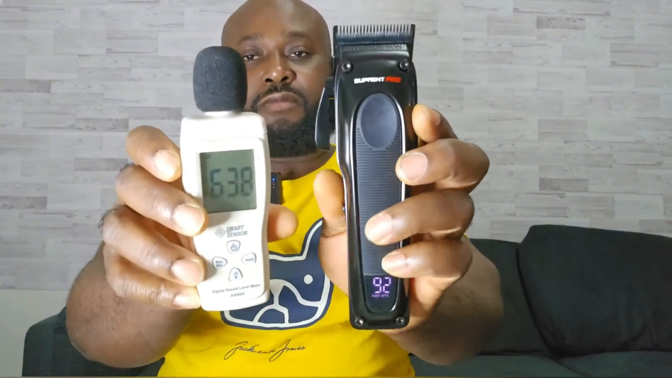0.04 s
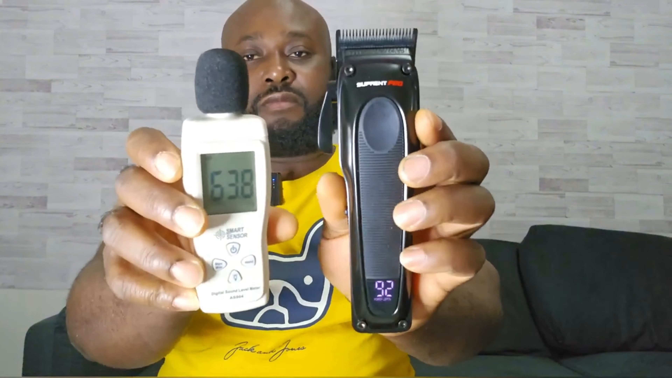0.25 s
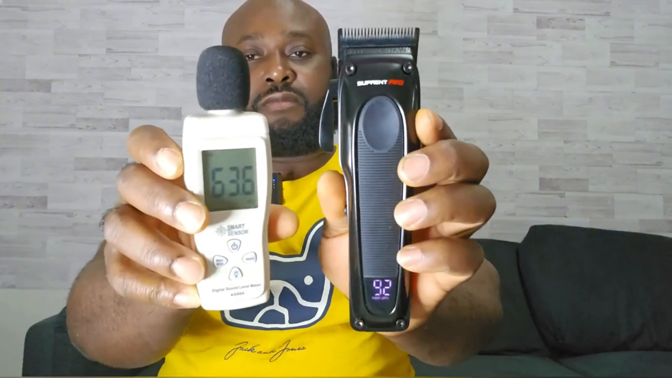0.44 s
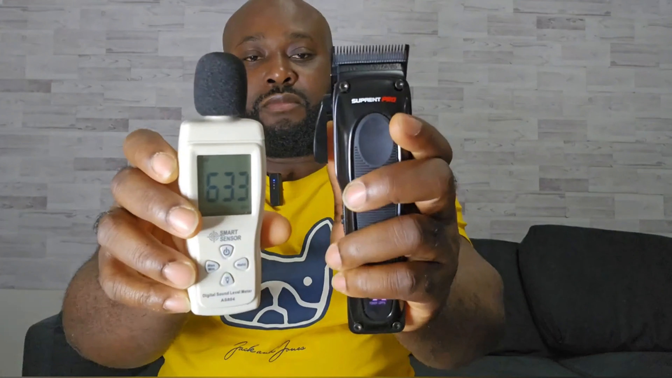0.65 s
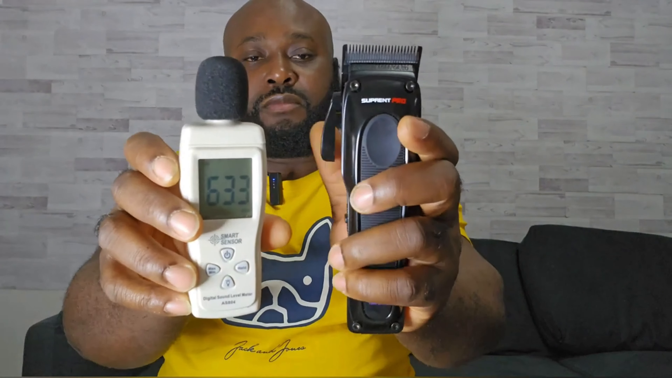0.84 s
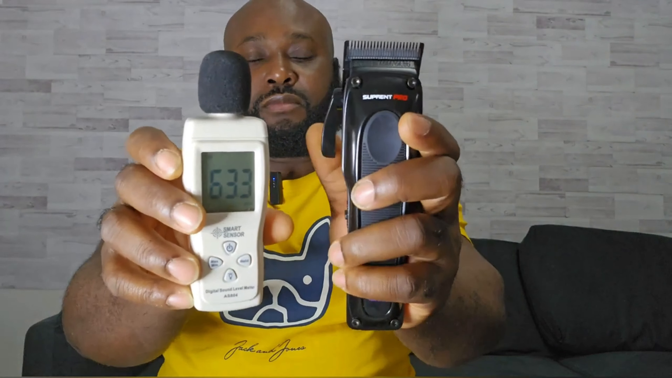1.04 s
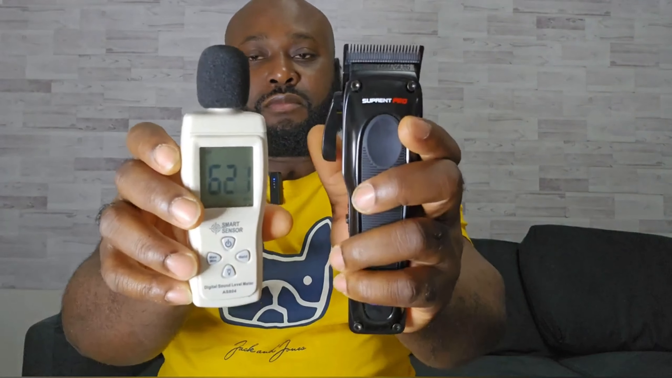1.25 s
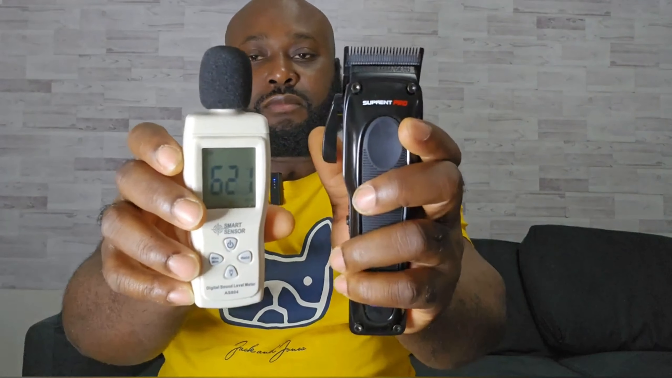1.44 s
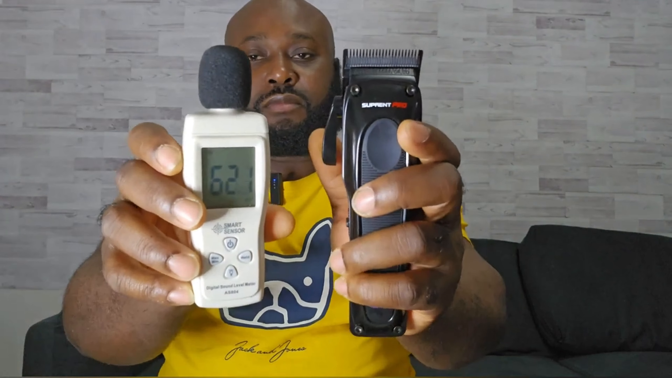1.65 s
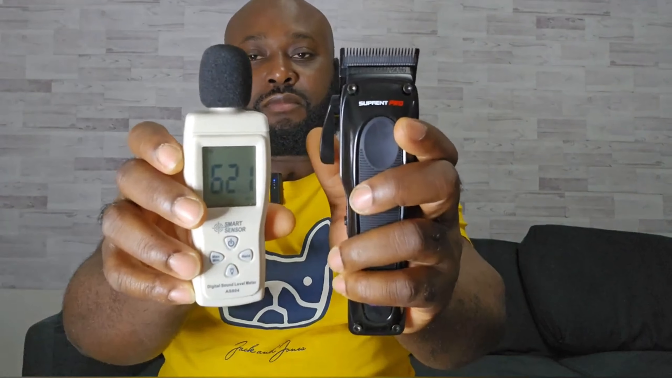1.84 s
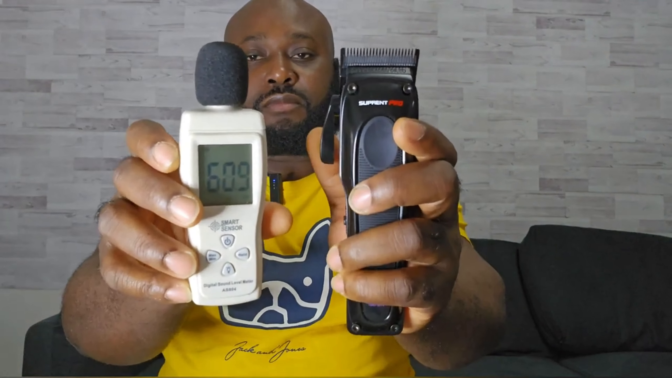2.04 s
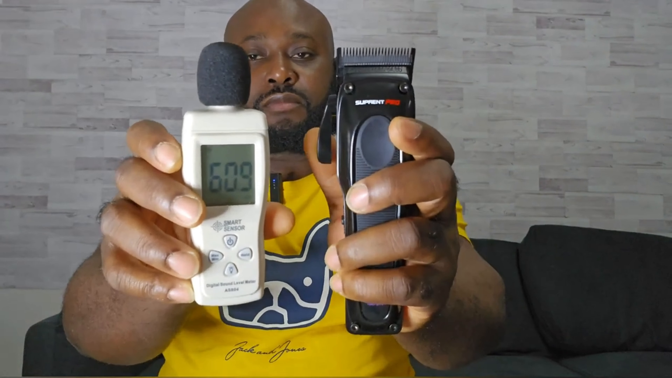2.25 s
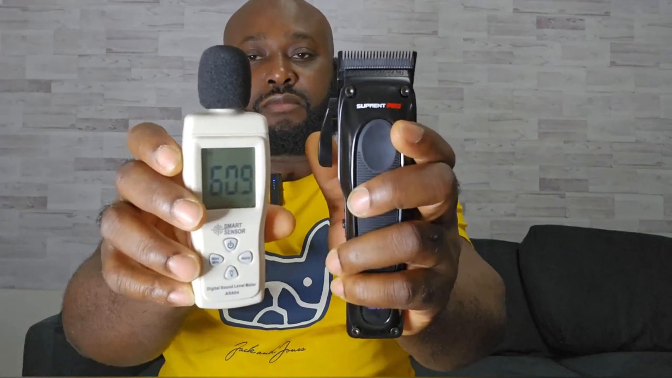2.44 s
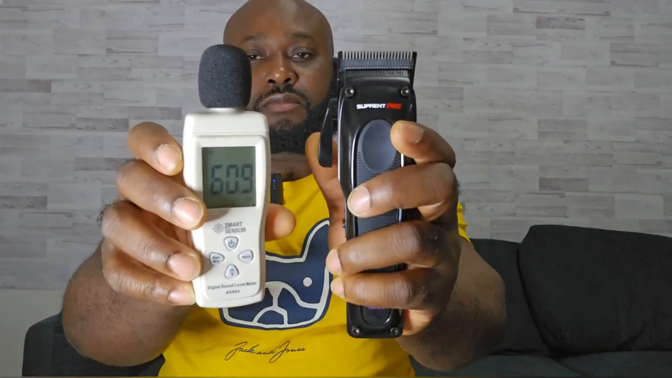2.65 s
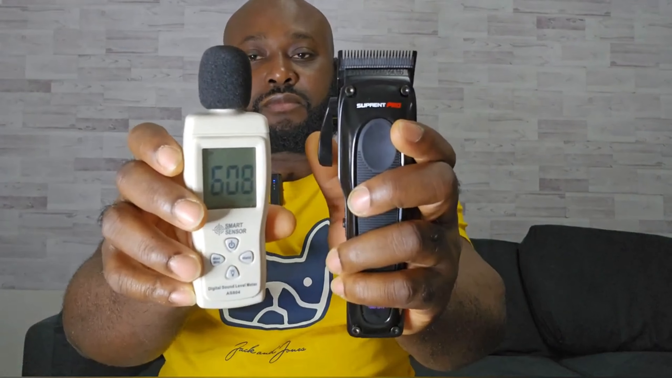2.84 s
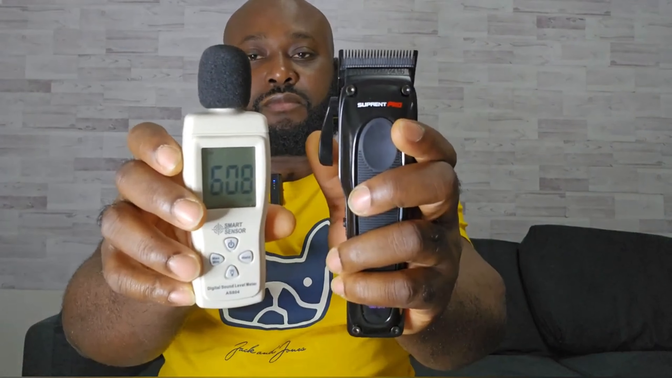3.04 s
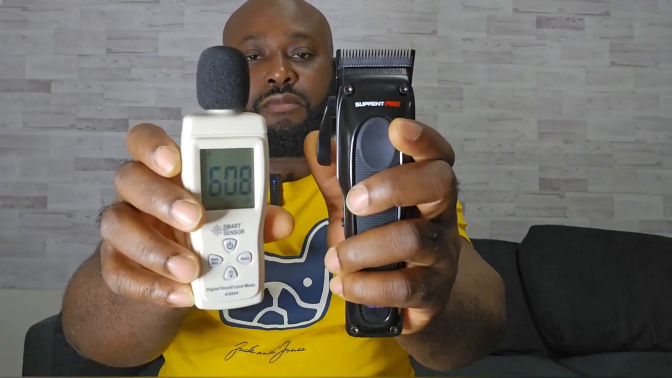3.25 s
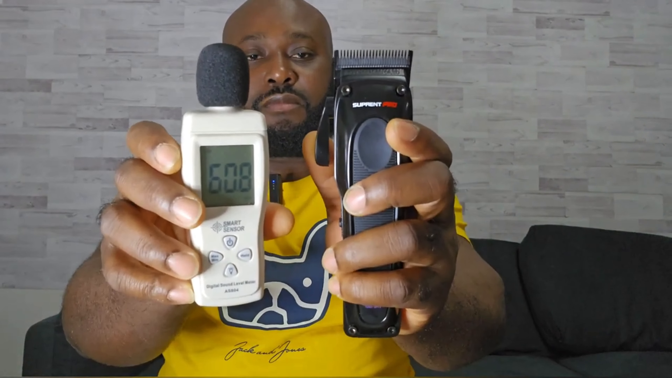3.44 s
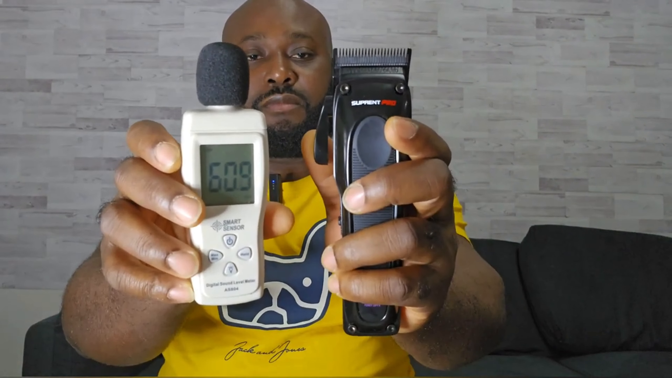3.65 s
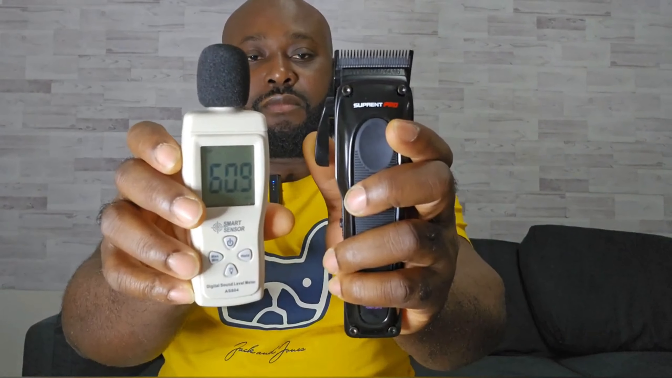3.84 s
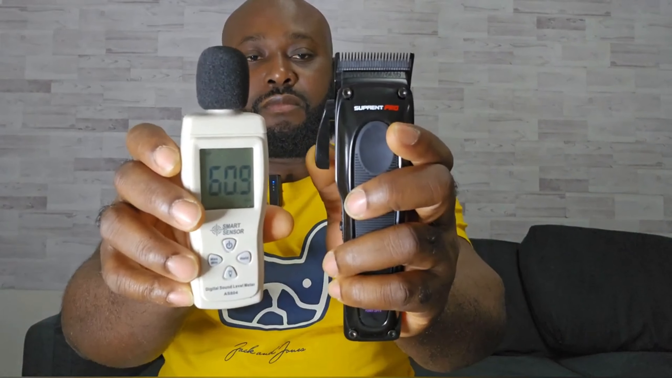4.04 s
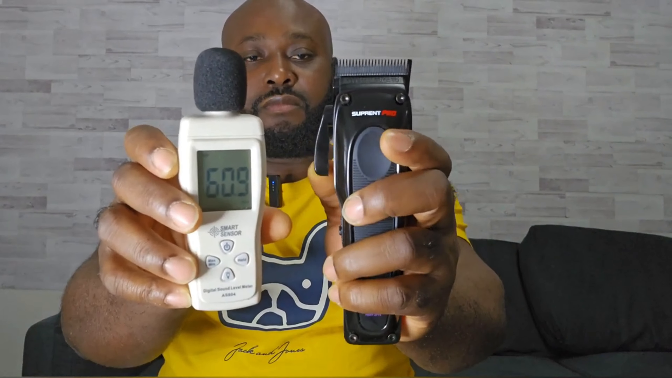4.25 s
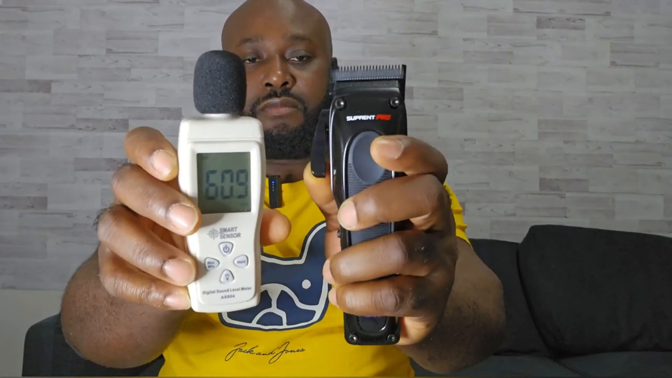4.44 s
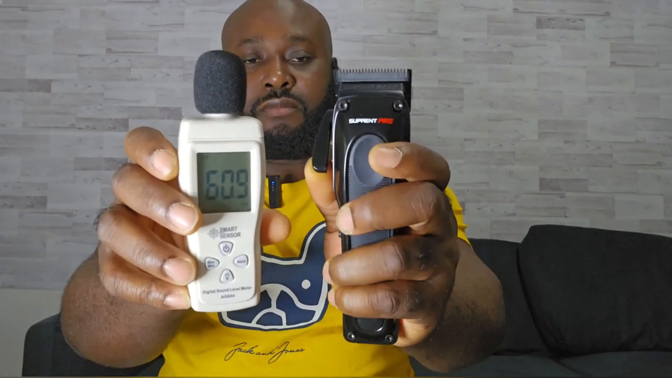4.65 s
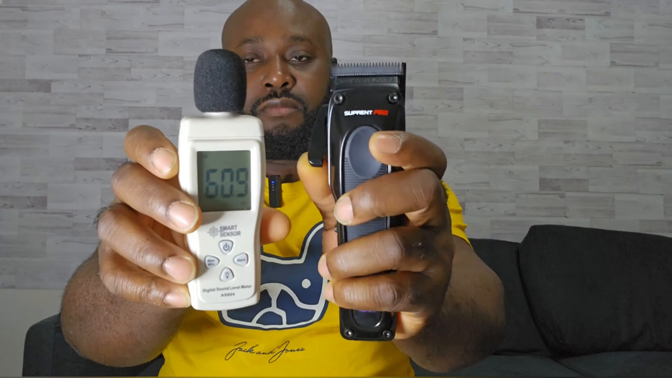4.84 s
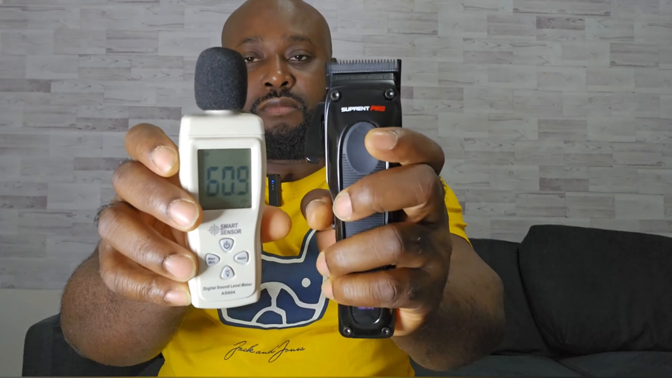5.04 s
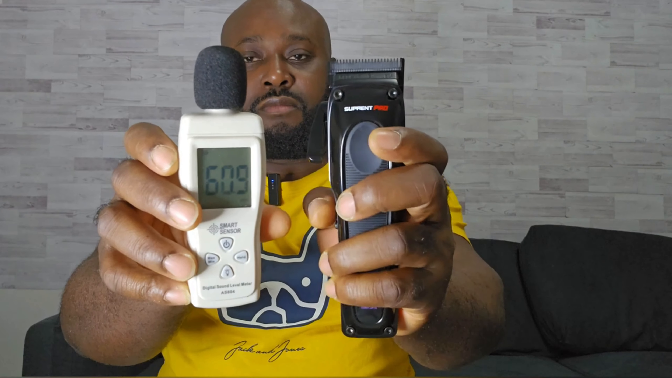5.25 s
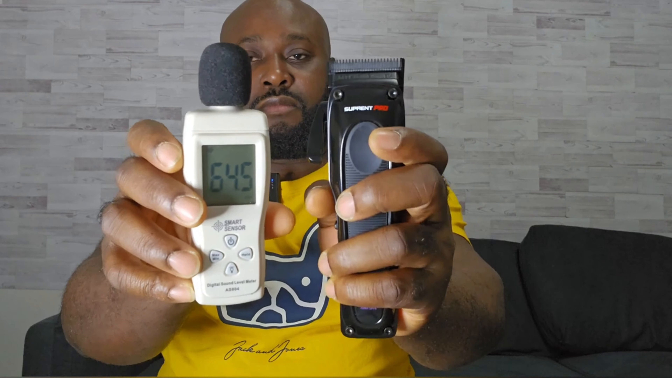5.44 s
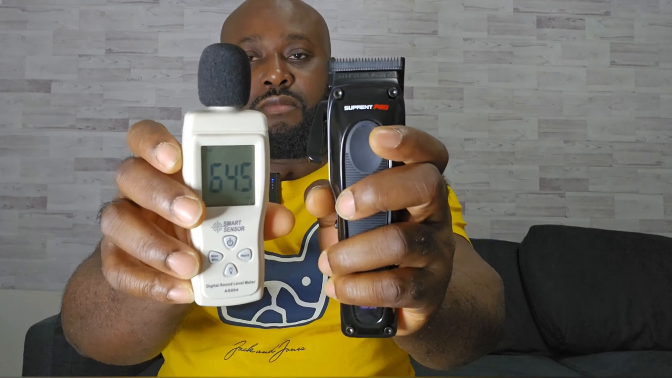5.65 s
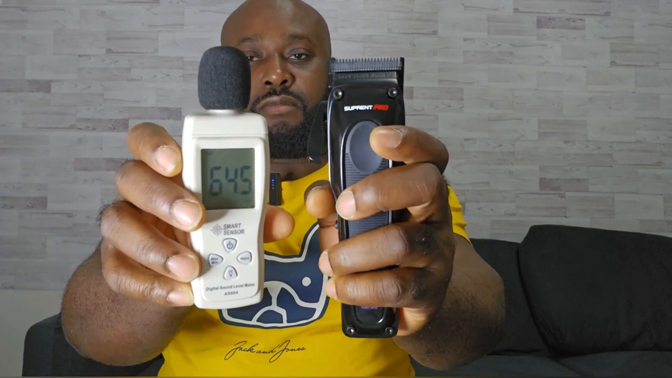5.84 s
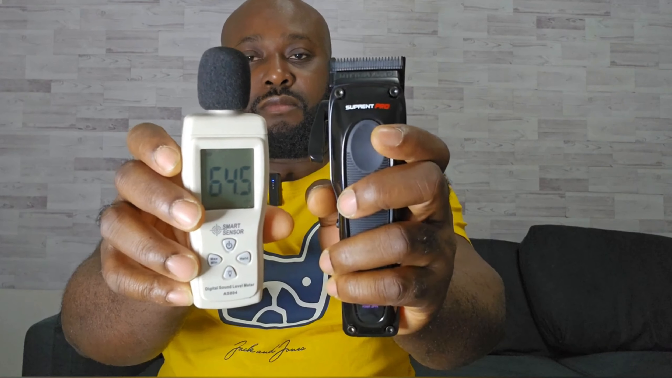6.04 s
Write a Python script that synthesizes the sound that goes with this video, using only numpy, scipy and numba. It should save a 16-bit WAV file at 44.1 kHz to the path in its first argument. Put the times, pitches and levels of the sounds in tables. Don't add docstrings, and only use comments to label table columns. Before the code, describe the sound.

Close, dry, nasal motor buzz with a raspy blade scrape, steady in pitch, picked up by a phone in a small room. Dull finger bumps and sleeve movement come midway. The clipper turns, its buzz wavering and getting thinner, while four hard metallic clicks snap in quick succession. Automatic gain then pulls everything down for about a second before a quieter buzz returns.

```python
import sys
import numpy as np
from scipy import signal
from scipy.fft import rfft, irfft, next_fast_len
from scipy.io import wavfile
from scipy.ndimage import uniform_filter1d
from numba import njit

SR = 44100
rng = np.random.default_rng(int(sys.argv[2]) if len(sys.argv) > 2 else 0)


def dump_mix(stems):
    frames = np.atleast_2d(stems).T
    limited = np.clip(frames, -1, 1)
    pcm = np.round(limited * 32767).astype(np.int16)
    wavfile.write(sys.argv[1], SR, pcm)


def amplitude_ratio(level_db):
    exponent = np.asarray(level_db, float) / 20
    return 10 ** exponent


N = 269451
HOP = SR // 100
SPLICE_S = .682


def shape(points, hz):
    f, value = np.transpose(points)
    return np.interp(np.log(np.maximum(hz, 1)), np.log(f), value)


def noise(db_of):
    size = next_fast_len(N)
    hz = np.arange(size // 2 + 1) * SR / size
    gain = amplitude_ratio(db_of(hz)) * np.sqrt(SR / 2)
    return irfft(rfft(rng.standard_normal(size)) * gain, size)[:N]


def walk(rate, count, size):
    k = max(int(100 / rate), 1)
    held = np.repeat(rng.standard_normal((count, size)), k, axis=1)[:, :size]
    return 1.44 * uniform_filter1d(uniform_filter1d(held, k), k)


@njit
def lines(turns, multiple, gain, phase, hop):
    out = np.zeros(len(turns))
    for start in range(0, len(turns) - 1, 49):
        for k in range(len(multiple)):
            z = np.exp(1j * (2 * np.pi * multiple[k] * turns[start] + phase[k]))
            spin = np.exp(2j * np.pi * multiple[k] * (turns[start + 1] - turns[start]))
            for i in range(start, min(start + 49, len(turns))):
                j, a = i // hop, (i % hop) / hop
                out[i] += ((1 - a) * gain[k, j] + a * gain[k, j + 1]) * z.imag
                z *= spin
    return out


# time in seconds, rate in Hz.
SWING_RATE = [(0, 116.88), (.7, 116.9), (.9, 117.0), (1.45, 116.97), (1.95, 116.87), (2.1, 116.72),
              (2.5, 116.84), (4.32, 116.86), (4.358, 118.8), (4.466, 117.4), (4.54, 118.0), (4.75, 117.2),
              (5.3, 117.03), (5.6, 116.92), (6.11, 116.9)]
SWING_HZ = SWING_RATE[0][1]


def crank(t):
    hz = np.interp(t, *np.transpose(SWING_RATE))
    return np.cumsum(hz) / SR + .25 - .45 * (t > SPLICE_S)


# middle in seconds, duration in seconds.
GRIP_CHANGES = [
    (0.678, .002),
    (1.9, 1.2),
    (4.345, 0.0098),
    (4.883, .12),
]


def grip(t):
    at = [s + side * d / 2 for s, d in GRIP_CHANGES for side in (-1, 1)]
    return np.interp(t, at, np.repeat(np.arange(len(GRIP_CHANGES) + 1), 2)[1:-1])


# frequency in Hz, level in dB.
TURNED_AWAY = [(6000, -0.5), (7000, 0.5), (7600, 8), (8500, 0.5), (10500, 2.5), (13000, -12), (14200, -9),
               (14900, -35)]


def shadow(hz):
    return shape(TURNED_AWAY, hz)


# multiple of swing rate, then level in dB facing, held, turning, turned.
CASE_PANELS = [(1, -23, -25, -12.5, -14.5), (2, -37, -44.5, -30.5, -34.5), (3, -10, -10, -11, -12.5),
               (4, -10, -9.5, -7, -17.5), (5, -8.5, -11.5, -11, -7), (6, -8.5, -9.5, -20, -17.5),
               (7, 0, -1.0, -2, 1.5), (8, -8.5, -6, -2.5, -4.5), (9, -9.5, -8.5, -7, -15),
               (10, -16, -11.5, -14, -21.5), (11, -17, -37.5, -9.5, -17), (12, -8, -24.5, -12.5, -0.5),
               (13, -17, -16.5, -19.5, -9.5), (14, -19, -89, -14.5, -4), (15, -11, -10.5, -19.5, -6),
               (16, -7, -5.5, -13, -8.5), (17, -12, -12.5, -10.5, -8), (18, -14.5, -17, -18, -19),
               (19, -13.5, -12, -10, -9.5), (20, -22, -17.0, -21, -22), (21, -10, -18.5, -7.5, -5.5),
               (22, -19.5, -17.5, -23, -17), (23, -28.5, -33, -23, -38), (24, -40, -53, -23.5, -15)]
# multiple of swing rate, level in dB facing, just gripped, settled.
BLADE_FRONT = [(25, -23, -29, -18), (26, -33, -18, -18), (27, -33, -26, -18), (28, -23.5, -32, -40),
               (29, -15, -14.5, -19.5), (30, -19, -24, -24), (31, -25, -27, -19), (32, -22, -30, -21),
               (33, -23, -27, -20), (34, -32, -26, -21.5), (35, -24, -22.0, -17.5),
               (36, -26.5, -16.5, -15.0), (37, -21, -28, -22), (38, -24, -19.5, -14.5),
               (39, -27.0, -38.5, -34.5), (40, -27, -20, -19), (41, -29.0, -30, -24),
               (42, -33.0, -17.0, -14), (43, -40.5, -30, -23.5), (44, -37.0, -19, -21.5),
               (45, -21.5, -32, -33), (46, -34, -21, -21.5), (47, -39.0, -28, -29), (48, -28.5, -28.5, -24),
               (49, -37, -25, -23), (50, -41, -27.5, -36.0), (51, -24, -28, -43), (52, -37, -27, -30),
               (53, -37, -18, -21.5), (54, -30.5, -28, -25)]
# multiple of swing rate, level in dB turning, turned.
BLADE_BEHIND = [(25, -9.5, -13.5), (26, -18.5, -36), (27, -14.5, -7.5), (28, -15, -16), (29, -23.5, -11),
                (30, -14.5, -43), (31, -14, -31), (32, -22, -9.5), (33, -28, -32), (34, -32, -31),
                (35, -26, -18), (36, -23.75, -34), (37, -15, -17), (38, -19.5, -34), (39, -26.5, -21),
                (40, -29.0, -34), (41, -19, -14.5), (42, -21.5, -31), (43, -28, -30), (44, -17, -19),
                (45, -36, -33), (46, -19.5, -25), (47, -24, -19), (48, -21.5, -24), (49, -24, -22),
                (50, -29, -26.5), (51, -32, -23), (52, -29.5, -21), (53, -25.25, -16.5), (54, -20, -15)]
# frequency in Hz, level in dB.
TOOTH_LINES = [(6600, -38), (7200, -27.5), (8500, -53.5), (9500, -30), (11000, -49.5), (12000, -60)]


def grip_levels(hz, uneven_db=3.0):
    facing, held, turning, turned = np.transpose(CASE_PANELS)[1:]
    case = [facing, held, held, turning, turned]
    blades = np.vstack([np.transpose(BLADE_FRONT)[1:], np.transpose(BLADE_BEHIND)[1:]])
    grips = np.hstack([case, blades])
    high_hz = hz[grips.shape[1]:]
    teeth = shape(TOOTH_LINES, high_hz) - 2
    teeth = teeth + uneven_db * rng.standard_normal((len(grips), len(teeth)))
    teeth[-1] += shadow(high_hz)
    grips = np.hstack([grips, teeth])
    power = np.sum(amplitude_ratio(grips[:, 2:22]) ** 2 / 2, axis=1, keepdims=True)
    return grips - 10 * np.log10(power)


# time in seconds, centre in Hz, width in Hz, level in dB, length in seconds.
PANEL_FLARES = [
    (4.36, 2480, 150, 7.5, 0.014),
    (4.416, 2050, 200, -3, .05),
    (4.62, 1350, 150, 3, 0.096),
    (4.8, 2220, 100, 5.5, 0.057),
    (4.8, 3250, 350, 6.5, .07),
]
# frequency in Hz, delay in ms.
RING_LAG = [(700, 4.2), (820, -.5), (950, 0), (1060, -.6), (1170, -2.4), (1520, -3), (1860, .8),
            (1990, -2.1), (2110, -.7), (2300, -2.3), (2520, .4), (4100, .3), (4300, -1.7), (12000, -2)]
# frequency in Hz, phase in radians.
RETURN_STROKE = [(700, -.7), (800, 0), (2800, 0), (3300, -.9), (4100, -.9), (4300, .5)]


def housing(turns, wander_db=.5, wander_top_db=0.8, turning_db=0.5, scatter=0.48):
    t = np.arange(N // HOP + 2) / 100
    order = np.arange(1., 101.)
    hz = order * SWING_HZ
    grips = grip_levels(hz)
    place = grip(t)
    db = np.array([np.interp(place, np.arange(len(grips)), g) for g in grips.T])
    spread = wander_db + wander_top_db * order[:, None] / len(order)
    db = db + spread * walk(1.91, count=len(order), size=len(t))
    turning = np.clip(1 - np.abs(place - 3), 0, 1)
    db = db + turning_db * turning * walk(14, count=len(order), size=len(t))
    for s, centre, width, flare_db, length in PANEL_FLARES:
        db = db + flare_db * np.exp(-((hz[:, None] - centre) / width) ** 2 - ((t - s) / length) ** 2)
    phase = -2 * np.pi * SWING_HZ * np.cumsum(shape(RING_LAG, hz)) / 1000
    phase = phase + shape(RETURN_STROKE, hz) * (order % 2)
    phase = phase + scatter * np.clip(hz / 2500 - 1, 0, 1) * rng.standard_normal(len(order))
    return lines(turns, order, amplitude_ratio(db), phase, HOP)


# frequency in Hz, density in dB per Hz.
BLADE_SCRAPE = [(300, -86.5), (800, -75), (1200, -75), (1400, -72.5), (1650, -75), (2500, -75.5),
                (4500, -77.5), (6500, -79), (8500, -86), (9500, -87), (11300, -84), (12200, -97.5),
                (14600, -100), (15500, -104)]


def rasp(t, turns, depth=0.11, lopsided=0.06, at_ms=-1.76, shaded_s=4.6):
    angle = 2 * np.pi * (turns - SWING_HZ * at_ms / 1000)
    gate = 1 + depth * np.cos(2 * angle) + lopsided * np.cos(angle)
    away = np.clip((t - shaded_s) / .2, 0, 1)
    facing = noise(lambda hz: shape(BLADE_SCRAPE, hz))
    turned = noise(lambda hz: shape(BLADE_SCRAPE, hz) + shadow(hz))
    return gate * (np.sqrt(1 - away) * facing + np.sqrt(away) * turned)


SCRAPE_BY_GRIP = [-3, -0.5, 1, 3.5, 3.5]
# time in seconds, level in dB.
ARM_LEVEL = [(0, -27), (.3, -26.5), (.68, -27), (1.2, -28.5), (1.6, -28), (3.6, -28), (4.32, -27.5),
             (4.37, -30), (4.45, -32), (6.11, -32)]


def clipper(t):
    turns = crank(t)
    rasp_db = np.interp(grip(t), np.arange(len(SCRAPE_BY_GRIP)), SCRAPE_BY_GRIP) + 24.5
    arm = amplitude_ratio(np.interp(t, *np.transpose(ARM_LEVEL)))
    return arm * (housing(turns) + amplitude_ratio(rasp_db) * rasp(t, turns))


# frequency in Hz, width in Hz, level in dB.
LEVER_MODES = [(950, 500, -15), (2200, 980, -17), (3420, 430, -21), (4360, 3000, -10.5), (5760, 1200, -1.5),
               (6620, 630, -2), (7640, 480, -1.5), (8700, 1200, -7.5), (9870, 710, -1), (10950, 1100, 2),
               (12200, 800, -2), (12900, 1100, -4), (14250, 1600, -4.5)]


def lever(hz, tilt_db):
    power = sum(amplitude_ratio(db) ** 2 / (1 + (2 * (hz - f) / w) ** 2) ** 2 for f, w, db in LEVER_MODES)
    return 10 * np.log10(power + 1e-12) + tilt_db * hz / 10000


# start in seconds, peak in dB, scrape before it in dB,
# scrape length in seconds, room tail in dB.
LEVER_SNAPS = [
    (4.497, 0, -22, .0047, -22),
    (4.53, -1, -21.5, 0.0037, -21),
    (4.6197, -0.5, -19.5, .004, -22),
    (4.6978, 1, -32.5, .002, -23.5),
]


def snaps(t, hold_s=0.0015, ring_s=0.00071, after_db=-13, after_s=0.0078, wall_s=0.0077, t60_s=0.24):
    near = noise(lambda hz: lever(hz, 0))
    far = noise(lambda hz: lever(hz, -5))
    near, far = near / near.std(), far / far.std()
    grains = np.repeat(rng.standard_normal(N // 88 + 1), 88)[:N]
    rattle = amplitude_ratio(1.3 * uniform_filter1d(grains, size=44))
    out = np.zeros(N)
    for s, db, scrape_db, scrape_s, tail_db in LEVER_SNAPS:
        u = t - s
        scrape = amplitude_ratio(scrape_db) * (u > -scrape_s) * (u <= 0)
        crack = (u > 0) * np.exp(-np.maximum(u - hold_s, 0) / ring_s) / 4.3
        chatter = amplitude_ratio(after_db) * (u > 0) * np.clip(2 - 2 * u / after_s, 0, 1) / 2
        walls = np.clip((u - wall_s) / hold_s + 1, .3, 1) * (u > 0)
        tail = amplitude_ratio(tail_db - 60 * np.abs(u) / t60_s) * walls
        out += amplitude_ratio(db) * (near * (scrape + crack + chatter) + far * tail * rattle)
    return out


# start in seconds, peak in dB, pitch in Hz, t60 in seconds, tick in dB.
FINGER_BUMPS = [(2.245, -34, 109, 0.045, -20), (2.84, -34, 105, 0.042, -20), (3.082, -30, 109, 0.051, 0),
                (3.144, -34, 118, 0.038, -20), (3.228, -28, 120, 0.038, -20),
                (3.315, -20.5, 115, 0.034, -14), (3.378, -46, 105, .04, -20), (3.612, -30, 174, 0.011, -14),
                (3.804, -23, 216, 0.016, -1.5), (3.845, -34, 300, .03, -14), (4.168, -35, 102, .04, -20),
                (4.284, -32, 108, .04, -20), (4.549, -34, 105, .05, -20)]


def bumps(t, push_s=0.0034, tick_s=0.0019, hollow=0.9, hollow_hz=1720):
    knock_shape = [(150, 1), (300, -5), (900, -9), (1700, -4), (2500, -26), (5000, -43)]  # Hz, dB
    knock = noise(lambda hz: shape(knock_shape, hz))
    knock = knock / knock.std()
    out = np.zeros(N)
    for s, db, hz, t60, tick_db in FINGER_BUMPS:
        u = np.maximum(t - s, 0)
        push = 1 - np.exp(-(u / push_s) ** 2)
        thud = push * amplitude_ratio(-60 * u / t60) * np.sin(2 * np.pi * hz * u)
        late = np.maximum(u - push_s / 2, 0)
        tick_envelope = late / tick_s * np.exp(1 - late / tick_s)
        tick = tick_envelope * (knock + hollow * np.sin(2 * np.pi * hollow_hz * late))
        out += amplitude_ratio(db) * (thud / np.abs(thud).max() + amplitude_ratio(tick_db) * tick)
    return out


# frequency in Hz, density in dB per Hz.
CLOTH_SHAPE = [(70, -103), (150, -72.5), (250, -70.5), (400, -77), (800, -100)]
# time in seconds, rise over the resting cloth in dB, length in seconds.
SLEEVE_RUSTLES = [(0, 8, .1), (0.603, 4.5, 0.21), (0.856, 12.5, 0.18), (1.46, 7.5, 0.12), (1.7, 5, 0.16),
                  (2.04, 7, 0.1), (3.845, 10, 0.081), (4.222, 9, 0.09), (4.556, 13.5, 0.11),
                  (4.95, 10.5, 0.21)]


def cloth(t):
    db = -10 + sum(up_db * np.exp(-((t - s) / length) ** 2) for s, up_db, length in SLEEVE_RUSTLES)
    return amplitude_ratio(db) * noise(lambda hz: shape(CLOTH_SHAPE, hz))


# frequency in Hz, rms level in dB.
MACHINE_LINES = [(58, -61), (95.4, -49.5), (191, -67.5), (1305, -52.5), (1338, -54), (1375, -60),
                 (1433, -46.5), (1470, -59.5)]


def hum(t, flutter_db=-2.0):
    hz, db = np.transpose(MACHINE_LINES)
    db = db[:, None] + flutter_db * walk(10, count=len(hz), size=N // HOP + 2)
    return lines(t, hz, np.sqrt(2) * amplitude_ratio(db), 2 * np.pi * rng.random(len(hz)), HOP)


# frequency in Hz, density in dB per Hz.
ROOM_RUMBLE = [(20, -75), (40, -71.5), (95, -69), (140, -73.5), (220, -91.5)]


def rumble(t, level_db=-3, swell_db=1.5):
    size = N // HOP + 1
    swell = np.interp(t, np.arange(size) / 100, walk(5, count=1, size=size)[0])
    return amplitude_ratio(level_db + swell_db * swell) * noise(lambda hz: shape(ROOM_RUMBLE, hz))


def duck(t, late_s=0):
    start_s, fall_s, hold_s, rise_s = 4.732, 0.54, .24, 0.19
    low_db, after_db = -18, -8.5
    back = start_s + fall_s + hold_s + late_s
    return np.interp(t, [start_s, start_s + fall_s, back, back + rise_s], [0, low_db, low_db, after_db])


def scene():
    t = np.arange(N) / SR
    near = amplitude_ratio(duck(t)) * clipper(t)
    room = rumble(t) + amplitude_ratio(-2.0) * hum(t) + cloth(t)
    room = room * amplitude_ratio(1.25 * duck(t, late_s=0.043))
    return (near + room + bumps(t) + snaps(t))[None]


def low_pass(x):
    return signal.sosfilt(signal.butter(12, 16460, fs=SR, output="sos"), x)


def record(dry):
    out_s, in_s = .009, 0.0073
    u = np.arange(N) / SR - SPLICE_S
    fade = np.clip(np.maximum(-u / out_s, u / in_s), 0, 1)
    treble_cut = signal.ellip(8, .2, 60, 15200, fs=SR, output="sos")
    wet = signal.sosfilt(treble_cut, dry * fade)
    return low_pass(np.clip(wet, -1, 1))


dry = scene()
out = record(dry)
dump_mix(out)
```